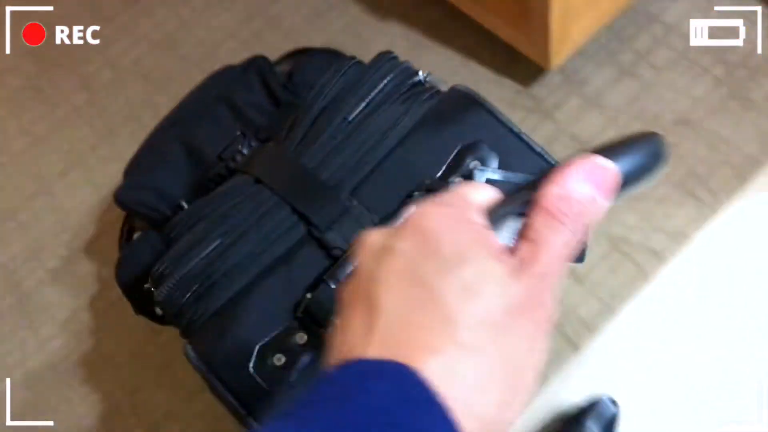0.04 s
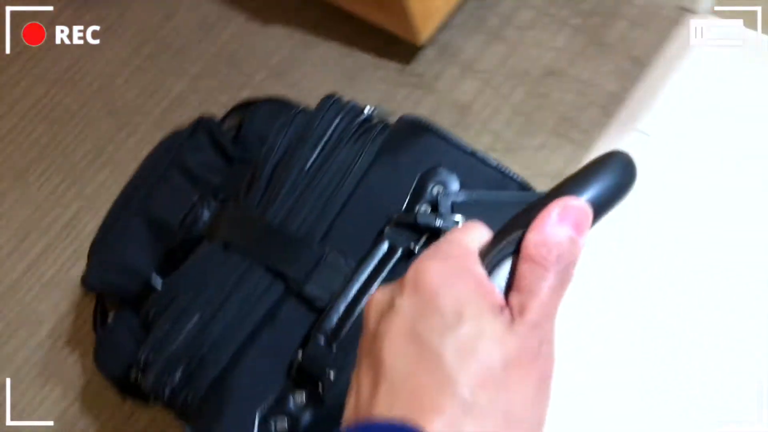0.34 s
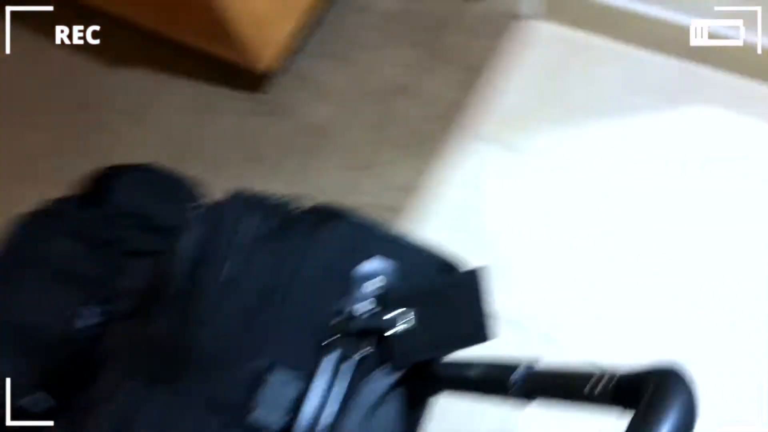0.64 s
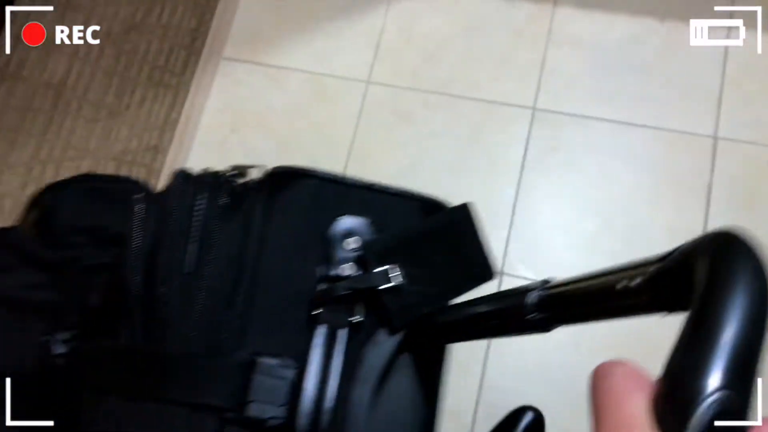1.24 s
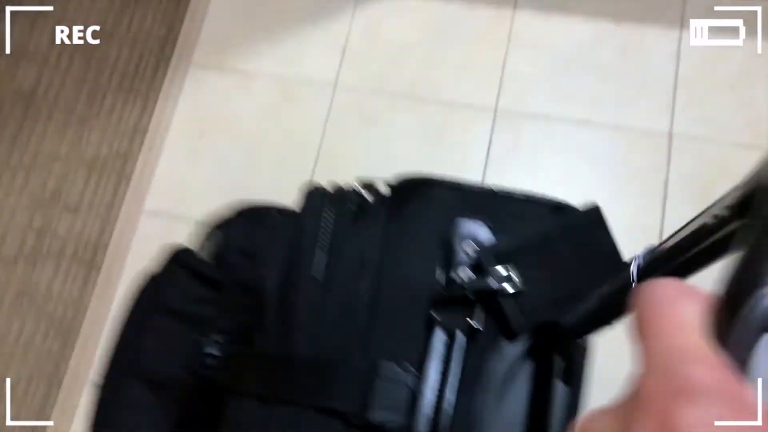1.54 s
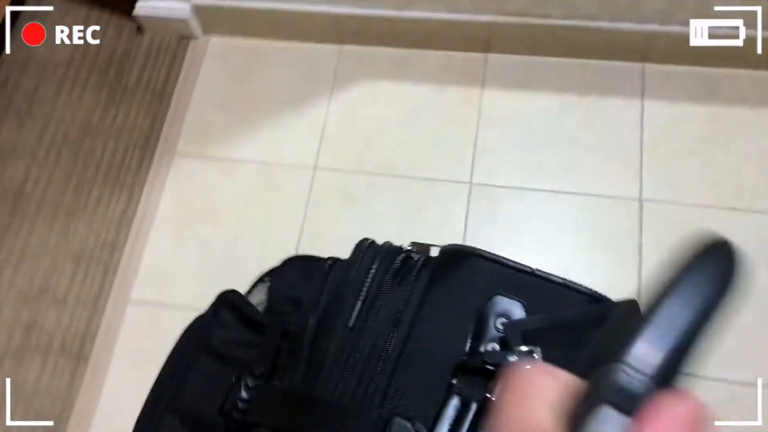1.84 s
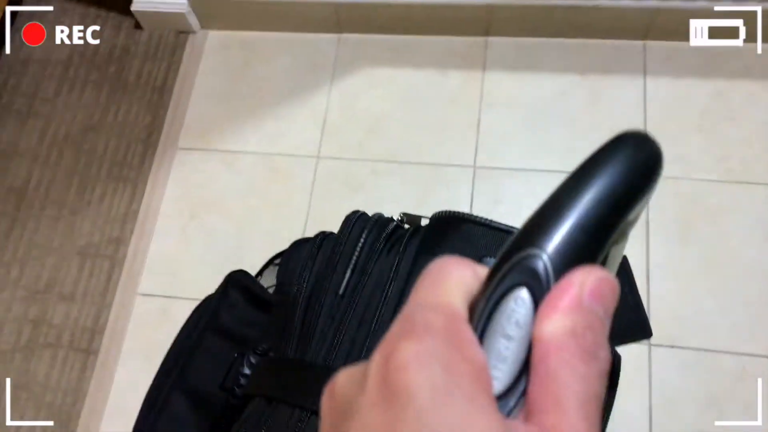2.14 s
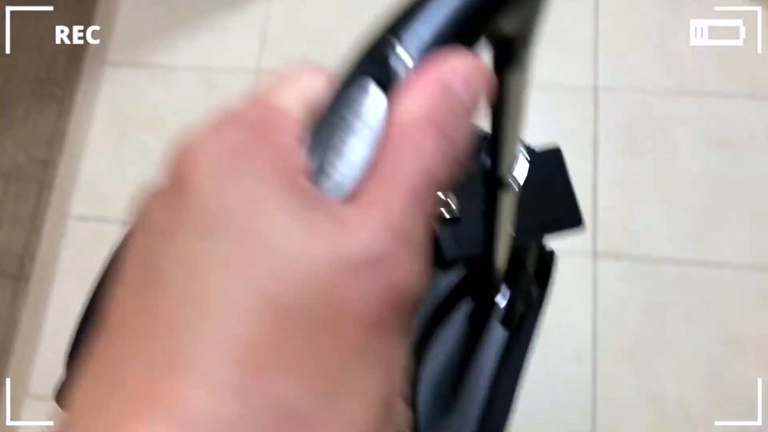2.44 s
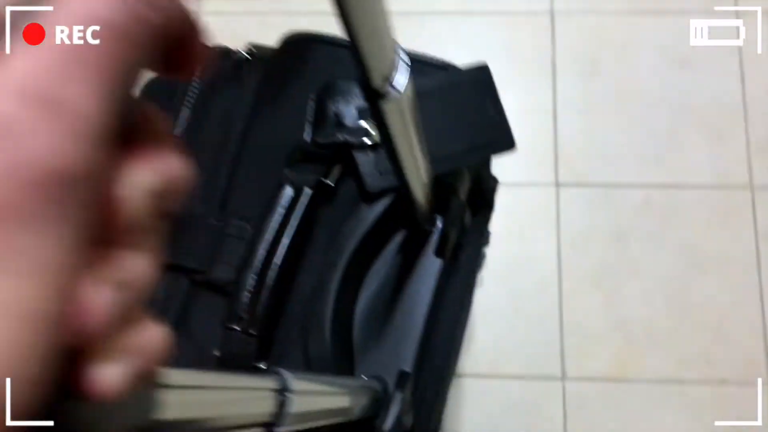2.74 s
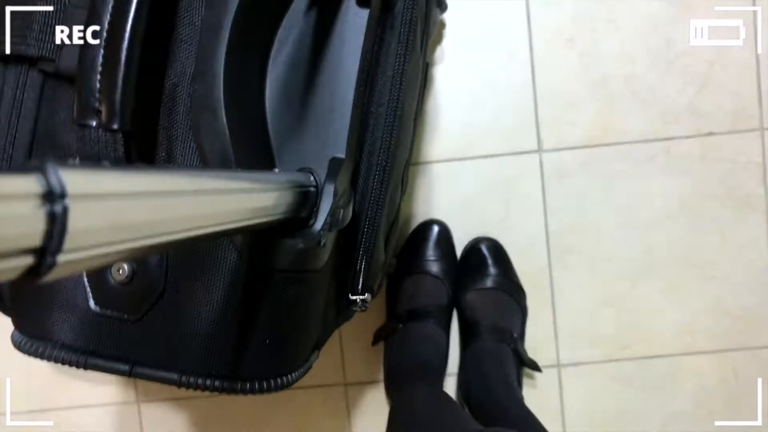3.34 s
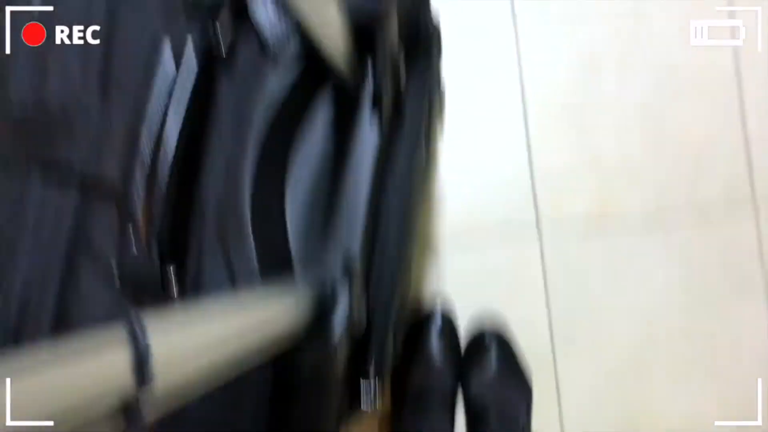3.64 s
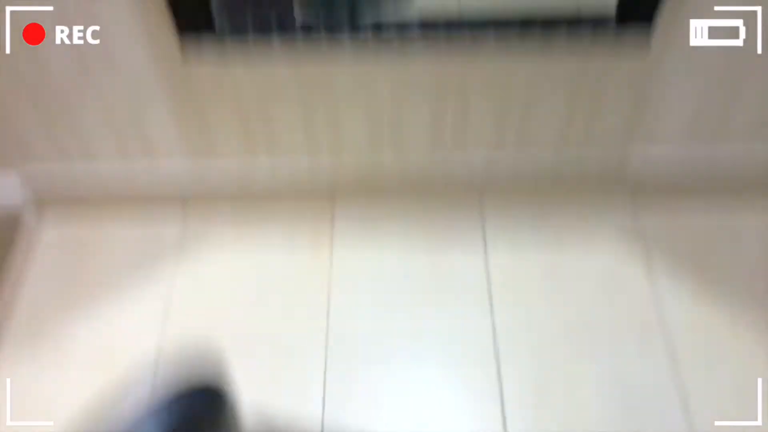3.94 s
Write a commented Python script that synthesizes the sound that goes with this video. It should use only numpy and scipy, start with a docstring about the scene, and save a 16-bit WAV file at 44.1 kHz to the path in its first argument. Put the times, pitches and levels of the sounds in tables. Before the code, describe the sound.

A suitcase rolls softly over carpet, with faint clicks and a zipper jingle. Its wheels bump onto tiles at about 1 second and the handle clicks. At 1.6 seconds the case thuds down, the loudest moment, followed by a brief rumble, rustling fabric and jingling zipper pulls until 2 seconds. Scattered handle clicks follow, then a close creak with a dull knock from 3.4 to 3.8 seconds. Low electrical hum continues throughout.

```python
"""A soft suitcase is pulled from carpet onto tiles and stood upright.
Its wheels swish, rumble and bump, the case thuds down, fabric rustles and metal zipper pulls jingle.
The sliding handle clicks in its sleeves, then creaks as it sticks and slips under the hand.
Behind it all is a room with a short echo and the hum of mains electricity."""
import sys
import numpy as np
from scipy import signal
from scipy.fft import rfft, irfft
from scipy.io import wavfile

SR = 44100
rng = np.random.default_rng(int(sys.argv[2]) if len(sys.argv) > 2 else 0)


def int16_out(signal):
    """Quantize to a 16-bit WAV file."""
    q = np.round(np.clip(np.atleast_2d(signal).T, -1, 1) * 32767)
    wavfile.write(sys.argv[1], SR, q.astype(np.int16))


N = 176400
TIME = np.arange(N) / SR
AGE = TIME[:SR // 2]  # seconds since a short sound began


def amp(db):
    """Turns decibels into a gain."""
    return 10 ** (np.asarray(db) / 20)


def unit(x):
    """Scales a signal to an average strength (rms) of 1."""
    return x / np.sqrt(np.mean(x ** 2) + 1e-20)


def level(points):
    """Gain over time from (time_s, level_db) points."""
    return amp(np.interp(TIME, *np.transpose(points)))


def add(mix, start_s, sound):
    """Mixes a sound in at its start time."""
    part = mix[max(round(start_s * SR), 0):][:len(sound)]
    part += sound[:len(part)]


def colour(x, points):
    """Shapes the tone by (pitch_hz, level_db) points, then scales to strength 1."""
    hz, db = np.transpose(points)
    freqs = np.fft.rfftfreq(len(x), 1 / SR)
    gain = amp(np.interp(np.log(freqs + 1), np.log(hz + 1), db))
    return unit(irfft(rfft(x) * gain, len(x)))


def noise(count=N):
    """Plain white noise."""
    return rng.standard_normal(count)


def burst(points):
    """Half a second of noise with the given tone."""
    return colour(noise(len(AGE)), points)


def decay(fade_s):
    """Dies away by 60 dB in fade_s seconds."""
    return np.exp(-np.log(1000) * AGE / fade_s)


def rise(rise_s):
    """A soft start."""
    return 1 - np.exp(-AGE / rise_s)


def ring(hz, fade_s):
    """One pure tone dying away."""
    return np.sin(2 * np.pi * hz * AGE) * decay(fade_s)


def ring_together(tones, fade_s):
    """Several dying tones; every second one starts in the opposite direction."""
    return sum((-1) ** k * amp(db) * ring(hz, fade_s) for k, (hz, db) in enumerate(tones))


def drift(rate_hz):
    """A random wobble, mostly slower than rate_hz."""
    freqs = np.fft.rfftfreq(N, 1 / SR)
    return unit(irfft(rfft(noise()) * np.exp(-(freqs / rate_hz) ** 2), N))


def flutter(rate_hz):
    """A random wobble in a tone's strength and phase, as complex numbers."""
    freqs = np.fft.fftfreq(len(AGE), 1 / SR)
    spectrum = np.fft.fft(noise(len(AGE)) + 1j * noise(len(AGE)))
    wobble = np.fft.ifft(spectrum / (1 + (freqs / rate_hz) ** 2))
    return wobble / np.sqrt(np.mean(abs(wobble) ** 2))


def room_tone(hum_hz=120.17):
    """Mains hum over soft air noise and a few pitches at which the room booms."""
    # tones in the hum: multiple, level_db
    hum_tones = [(1, 2.5), (2, -28), (3, -28.5), (10, -31)]
    # how the hum swells: time_s, gain_db
    hum_gain = [(0.0, -33), (0.02, -33.5), (0.58, -32.5), (1.11, -34), (2.68, -35.5), (3.36, -41.5),
                (3.63, -41), (3.98, -36.5), (4.0, -36)]
    # the room's booms: pitch_hz, width_hz, level_db
    booms = [(58.5, 9.1, -53), (258.4, 49, -55), (890, 155, -69)]
    # how the booms swell: time_s, gain_db
    boom_gain = [(0, -11), (.45, 2), (.75, -1), (1.6, 2), (1.92, -6.5), (2.2, 1), (2.9, 2.5), (3.25, -2),
                 (4, -0.5)]
    # tone of the air: pitch_hz, level_db
    air_tone = [(25, -32.5), (45, -22.5), (85, -13.5), (125, -14), (160, -17), (260, -15.5), (400, -28),
                (650, -31.5), (1150, -31), (1700, -39), (3000, -45.5), (6000, -53), (10000, -60.5),
                (16000, -59)]
    hum = sum(amp(db) * np.sin(2 * np.pi * (k * hum_hz * TIME + rng.random())) for k, db in hum_tones)
    freqs = np.fft.rfftfreq(N, 1 / SR)
    boom = np.zeros(N)
    for hz, width_hz, db in booms:
        band = 1 / (1 + (2 * (freqs - hz) / width_hz) ** 2)
        boom += amp(db) * unit(irfft(rfft(noise()) * band, N))
    air = amp(-51.5) * colour(noise(), air_tone)
    return hum * level(hum_gain) + boom * level(boom_gain) + air


def wheels(lumpy_db=5, grain_db=3):
    """Rolling wheels rumble unevenly and swish through the carpet pile."""
    # loudness of the rumble: time_s, level_db
    roll_level = [(0, -66), (.35, -56), (.47, -51.5), (.65, -56.5), (1, -62), (1.2, -58), (1.33, -52),
                  (1.5, -49), (1.75, -40), (1.95, -56), (2.3, -62), (3.3, -63.5), (3.5, -58.5), (4, -68)]
    # its tone: pitch_hz, level_db
    roll_tone = [(60, -48), (180, -0.5), (380, -1), (700, -9.5), (1300, -20.5), (2500, -31), (8000, -72)]
    # loudness of the swish: time_s, level_db
    swish_level = [(0, -58.5), (.3, -68), (.41, -66), (.44, -54), (.475, -66), (.5, -51.5), (.535, -58),
                   (.57, -59), (.72, -61.5), (.8, -61), (.84, -68), (.88, -84), (.95, -56), (1.05, -79),
                   (1.15, -88)]
    # its tone: pitch_hz, level_db
    swish_tone = [(200, -4.5), (500, 0.5), (900, 6.5), (1500, 0), (2600, -4.5), (4000, -7.5), (7000, -17),
                  (16000, -21)]
    roll = colour(noise() * amp(lumpy_db * drift(rate_hz=120)), roll_tone)
    swish = colour(noise() * amp(grain_db * noise()), swish_tone)
    return level(roll_level) * roll + level(swish_level) * swish


def fabric(grain_db=4, clump_db=2):
    """Nylon cloth rustles in clumps of tiny slips."""
    # loudness of the rustle: time_s, level_db
    rustle_level = [(0, -62), (.3, -65.5), (.52, -64), (.6, -68), (.88, -62.5), (1.15, -78), (1.23, -73),
                    (1.27, -62.5), (1.46, -73), (1.505, -53.5), (1.63, -51.5), (1.685, -42), (1.75, -48.5),
                    (1.88, -52.5), (2.02, -56.5), (2.2, -70.5), (2.5, -73.5), (3.38, -71), (3.62, -85),
                    (4, -74)]
    # its tone: pitch_hz, level_db
    rustle_tone = [(200, -11), (1000, 7.5), (1700, 2.5), (3000, 0), (4800, 0), (6300, 2.5), (8500, -0.5),
                   (11000, -0.5), (13500, 0), (16000, -7)]
    slips = noise() * amp(grain_db * noise() + clump_db * drift(rate_hz=98))
    return level(rustle_level) * colour(slips, rustle_tone)


def zipper_pulls():
    """Shaken pulls clash, then ring unevenly, buzzing in their loops."""
    # jingles: start_s, ring_db, clash_db
    jingles = [(.025, -69, -63), (.1211, -45.5, -55), (.838, -63, -47.5), (.885, -64, -51),
               (.9343, -59, -50.5), (1.6746, -52, -35.5), (1.686, -42, -39), (1.708, -41, -50),
               (1.7784, -64, -40), (1.832, -53, -52), (1.931, -57, -33.5), (1.9365, -45, -38),
               (1.947, -46.5, -44), (2.008, -62, -53), (2.18, -74, -58), (2.245, -71, -58),
               (2.34, -69, -72), (2.675, -73, -54)]
    # tones of the pulls: pitch_hz
    pull_hz = [6200, 6450, 9890, 9945, 13250, 13480]
    # strength of each: level_db
    pull_db = [-14, -17.5, -3, -7, -11, -1]
    # tone of the clash: pitch_hz, level_db
    clash_tone = [(500, 19), (1500, 2), (4000, -0.5), (6200, 7), (8500, -2), (11000, 3), (13600, 3.5),
                  (16000, -53)]
    out = np.zeros(N)
    for start_s, ring_db, clash_db in jingles:
        ringing = 0
        for hz, db in zip(pull_hz, pull_db):
            wobble = flutter(rate_hz=44) + amp(-5) * flutter(rate_hz=450)  # waver plus buzz
            tone = (wobble * np.exp(2j * np.pi * hz * AGE)).real
            ringing += amp(db) * tone * decay(0.2 * 9900 / hz)  # high tones die first
        clash = amp(clash_db) * burst(clash_tone) * decay(0.061)
        add(out, start_s, rise(0.00045) * (amp(ring_db) * ringing + clash))
    return out


def tick(db):
    """One dry slip of plastic."""
    # tone of the slip: pitch_hz, level_db
    tick_tone = [(400, -21), (1500, 3.5), (2800, 7), (4200, -3.5), (5800, 0), (8500, -7), (12000, -11),
                 (16000, -13)]
    return 0.5 * amp(db) * burst(tick_tone) * decay(0.0058)


def handle_ticks():
    """The handle's plastic slips now and then."""
    # single ticks: start_s, level_db
    ticks = [(0.318, -45), (1.2415, -54), (1.244, -41), (1.2512, -35.5), (1.3096, -37.5), (2.108, -41),
             (2.12, -45), (2.236, -48), (2.2842, -43.5), (3.0715, -38.5), (3.4176, -42), (3.501, -41),
             (3.535, -45), (3.558, -34), (3.5824, -38), (3.6003, -38), (3.663, -46), (3.8056, -39),
             (3.8154, -39), (3.831, -42.5)]
    out = np.zeros(N)
    for start_s, db in ticks:
        add(out, start_s, tick(db))
    return out


def wheel_scuffs():
    """A wheel rasps briefly as it slides sideways."""
    # scuffs: start_s, level_db
    scuffs = [(.426, -54), (.4928, -54), (.528, -53), (.838, -50.5), (1.0271, -51.5), (1.5354, -40.5),
              (1.556, -44), (2.657, -50)]
    # their tone: pitch_hz, level_db
    scuff_tone = [(300, -11), (900, 2.5), (1600, 6.5), (2800, -0.5), (4500, -13.5), (8000, -17),
                  (16000, -25)]
    out = np.zeros(N)
    for start_s, db in scuffs:
        add(out, start_s, amp(db) * burst(scuff_tone) * rise(0.001) * decay(0.088))
    return out


def handle_clicks():
    """A joint snaps, so the tubes scrape and ring; a lower main pitch gives a duller click."""
    # clicks: start_s, level_db, pitch_hz, ring_db, scrape_db, fade_s
    clicks = [(0.4337, -51, 3740, 0, -1, 0.03), (.4928, -46.5, 2550, -1, 0, .03),
              (1.2285, -60, 3900, 8, -8, .02), (1.3458, -42.5, 3820, 1, 2, 0.024),
              (1.379, -64, 5600, 9, -12, 0.034), (1.4789, -31, 7300, 5, -3, 0.011),
              (1.4916, -36.5, 6970, 8, -11, 0.013), (1.8961, -45.5, 2100, 22, -1, 0.0063),
              (2.0868, -33, 4670, 5.5, 3, 0.014), (2.1396, -44.5, 3750, 4.5, 4.5, 0.028),
              (2.6524, -41.5, 1450, 6, 11.5, .018), (3.2826, -48, 2450, 4.5, -8, 0.037)]
    # tones of the tubes: pitch_hz, level_db
    tube_tones = [(3000, -4), (4000, -5.5), (4650, -9.5), (5600, -4.5), (6050, -6.5), (7200, -19),
                  (9350, -9), (11900, -7), (12500, 1)]
    # tone of the scrape: pitch_hz, level_db
    scrape_tone = [(400, -13), (1300, -5), (3500, -3.5), (7000, -3), (12000, 2), (16000, -4)]
    out = np.zeros(N)
    for start_s, db, hz, ring_db, scrape_db, fade_s in clicks:
        tubes = ring_together(tube_tones, fade_s)
        scrape = amp(scrape_db) * burst(scrape_tone) * decay(fade_s)
        treble_cut = signal.butter(3, min(2.6 * hz, SR / 2 - 1000), fs=SR)
        snap = signal.lfilter(*treble_cut, tubes + scrape)
        main_tone = amp(ring_db) * ring(hz, fade_s)
        add(out, start_s, amp(db) * rise(0.00055) * (snap + main_tone))
    return out


def thud(db, hz, peak_cycles=0.64):
    """A dull blow that swings back and forth only once or twice."""
    swell = AGE * hz / peak_cycles
    return amp(db) * np.sin(2 * np.pi * hz * AGE) * (swell * np.exp(1 - swell)) ** 2


def case_bumps():
    """The case thuds on the floor; its body rings and the loose things inside shake."""
    # bumps: start_s, level_db, pitch_hz, ring_db
    bumps = [(1.0395, -30.5, 580, 3.5), (1.042, -25.5, 275, -10), (1.0595, -42, 258, -1),
             (1.074, -29.5, 285, -6), (1.100, -30.5, 500, -1.5), (1.268, -38.5, 680, 11.5),
             (1.326, -37.5, 486, -7), (1.592, -12, 337, 0), (1.604, -18, 420, -3), (1.6145, -17.5, 272, 5),
             (1.6252, -18, 338, -2.5), (1.674, -27, 280, -11), (2.146, -34.5, 590, 6)]
    # tones of the body: pitch_hz
    body_hz = [294, 356, 385, 415, 468, 509, 549, 784, 840, 896, 1087]
    # strength of each: level_db
    body_db = [-19.5, -34, -21, -15.5, -22, -16.5, -28, -35, -32, -26.5, -24.5]
    # tone of the contents: pitch_hz, level_db
    shake_tone = [(30, -35), (100, -14), (230, 7), (500, -4.5), (700, -8), (1050, -8), (1500, -16.5),
                  (2500, -24.5), (8000, -41)]
    body = 0.5 * ring_together(zip(body_hz, body_db), fade_s=0.26) * rise(0.0034)
    out = np.zeros(N)
    for start_s, db, hz, ring_db in bumps:
        shake = amp(-18) * burst(shake_tone) * decay(0.27) * rise(0.0075)
        add(out, start_s, thud(db, hz) + amp(db + ring_db) * (body + shake))
    return out


def handle_knocks():
    """The handle knocks dully against its stop."""
    # knocks: start_s, level_db, pitch_hz
    knocks = [(2.6528, -39.5, 740), (3.5596, -26.5, 460)]
    out = np.zeros(N)
    for start_s, db, hz in knocks:
        add(out, start_s, thud(db, hz))
    return out


def hand_rub(grain_db=3):
    """Skin slides over the plastic grip."""
    # loudness of the rub: time_s, level_db
    rub_level = [(3.37, -75), (3.42, -54.5), (3.49, -52), (3.53, -60), (3.59, -57), (3.63, -54),
                 (3.72, -56.5), (3.79, -59), (3.83, -58), (3.9, -64), (4, -72)]
    # its tone: pitch_hz, level_db
    rub_tone = [(300, -29), (800, 8), (1700, 2.5), (2400, -8), (3300, -11), (4500, -16.5), (5600, -9),
                (7000, -18), (8400, -15), (10500, -22), (16000, -30)]
    return level(rub_level) * colour(noise() * amp(grain_db * noise()), rub_tone)


def handle_creak(jitter=0.2, spread_db=0.5):
    """The loaded handle sticks and slips, making a fast, uneven run of ticks."""
    # course of the creak: time_s, slips_per_s, level_db
    creak = [(3.405, 115, -48), (3.43, 132, -36.5), (3.49, 174, -41.5), (3.521, 65, -49), (3.59, 54, -50),
             (3.615, 90, -40), (3.68, 87, -45.5), (3.779, 60, -46)]
    times, rates, levels = np.transpose(creak)
    out = np.zeros(N)
    now_s = times[0]
    for gap, softness in rng.standard_normal((80, 2)):
        if now_s < times[-1]:
            add(out, now_s, tick(np.interp(now_s, times, levels) - spread_db * softness))
        now_s += np.exp(jitter * gap) / np.interp(now_s, times, rates)
    return out


def room_echo(x, fade_s=0.33, treble_hz=3900):
    """Sound bounces off tiles and walls, leaving a short, dull tail."""
    tail = signal.lfilter(*signal.butter(1, treble_hz, fs=SR), noise(len(AGE)))
    tail = tail * decay(fade_s) * rise(0.0034)
    return signal.fftconvolve(x, tail / np.linalg.norm(tail))[:N]


def scene():
    """The suitcase in the humming room; the handle is nearest, so it has the least echo."""
    background = room_tone()
    case = wheels() + fabric() + case_bumps() + wheel_scuffs() + zipper_pulls()
    handle = hand_rub() + handle_creak() + handle_clicks() + handle_ticks() + handle_knocks()
    echo = room_echo(amp(-11.5) * case + amp(-21) * handle)
    return (background + case + handle + echo)[None]


def record(dry):
    """Cuts away the very highest treble."""
    cutoff_hz = 15900
    treble_cut = signal.firwin(511, cutoff_hz, window=("kaiser", 9), fs=SR)
    return signal.oaconvolve(dry, treble_cut[None], "same")


dry = scene()
out = record(dry)
int16_out(out)
```